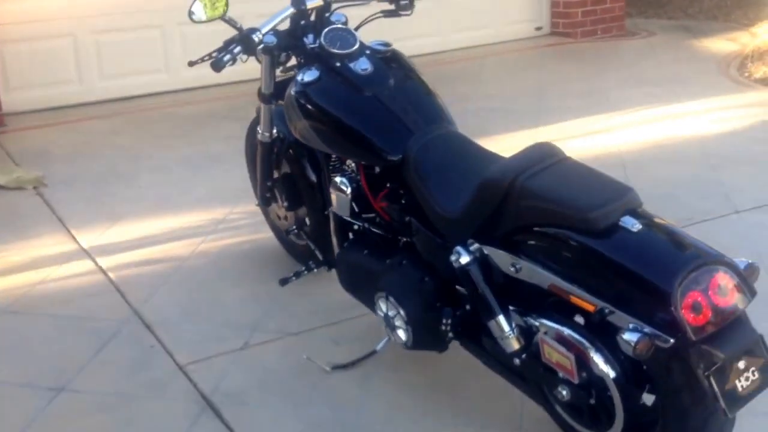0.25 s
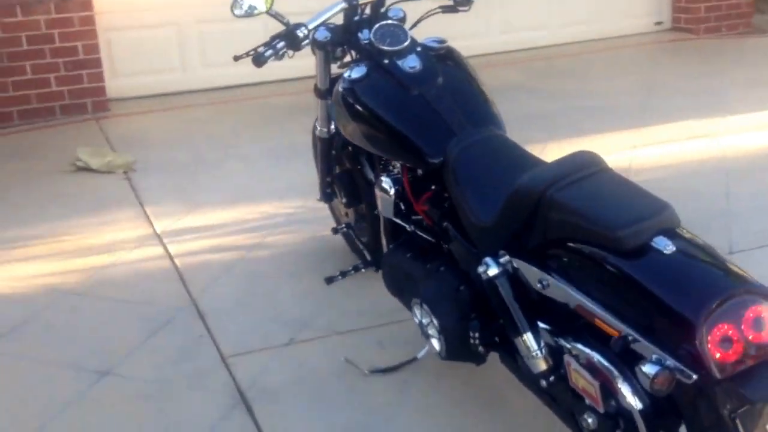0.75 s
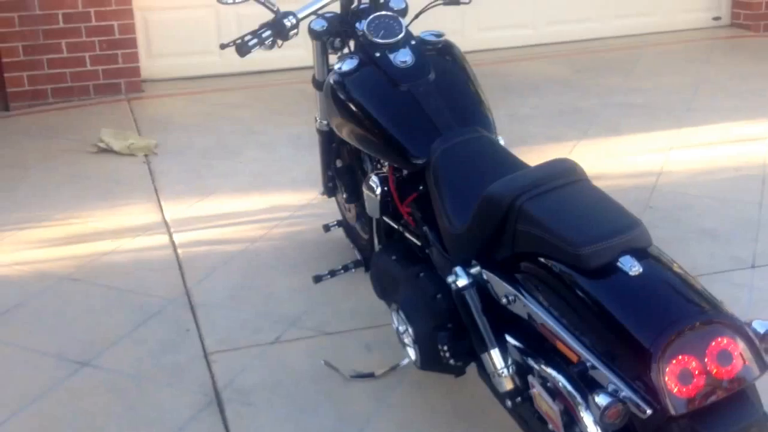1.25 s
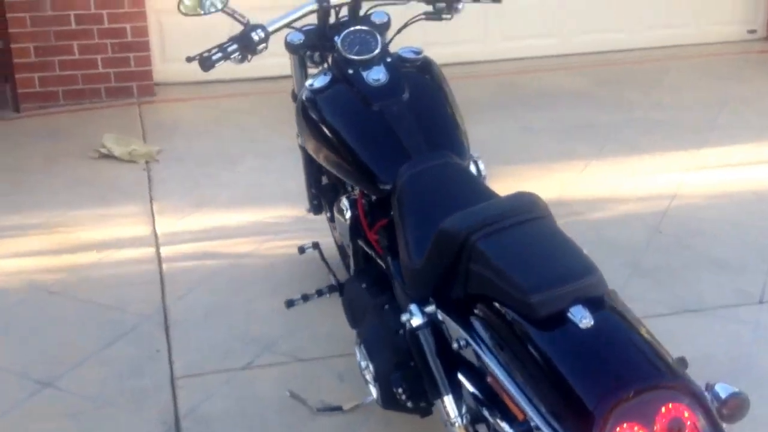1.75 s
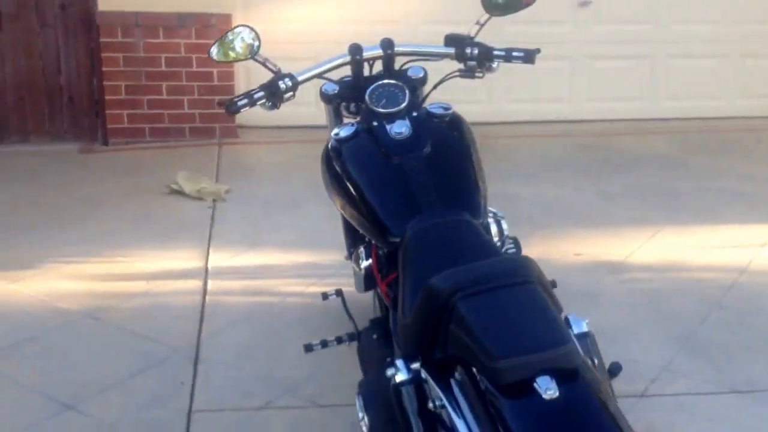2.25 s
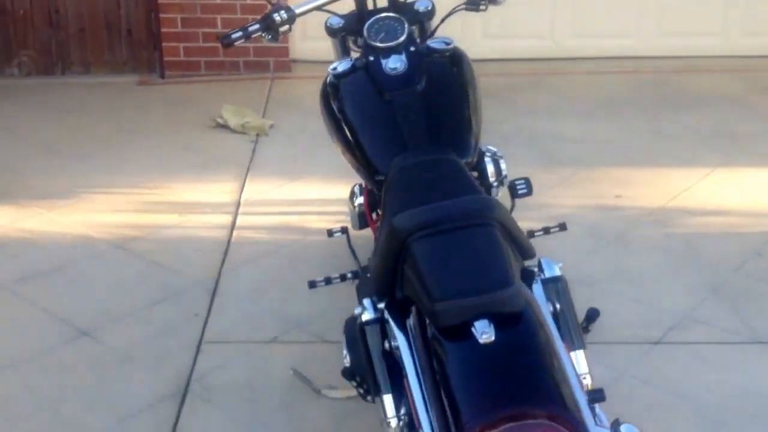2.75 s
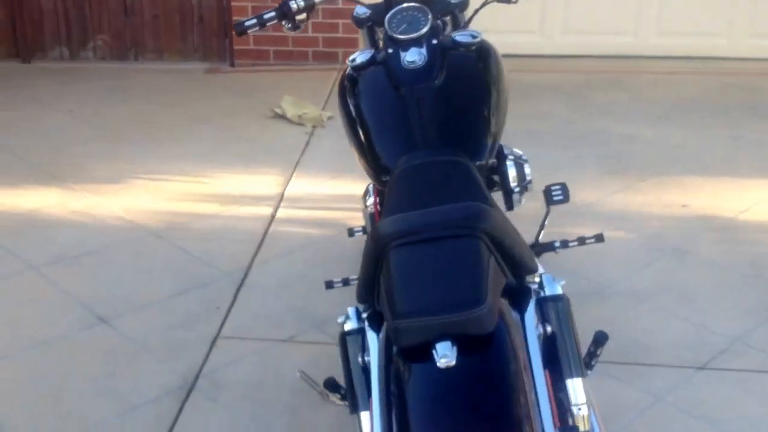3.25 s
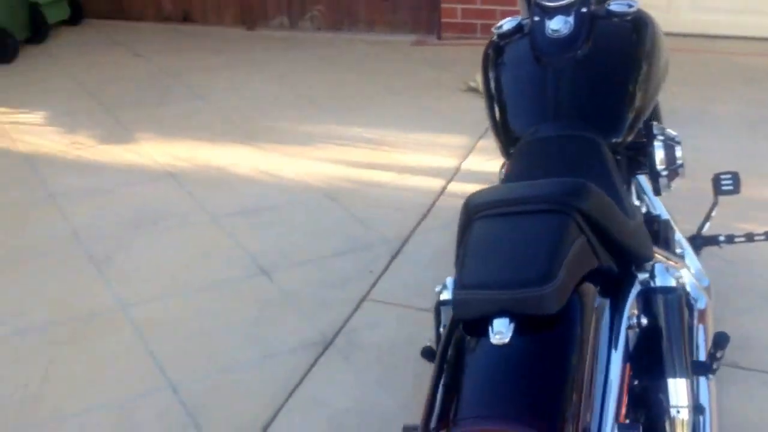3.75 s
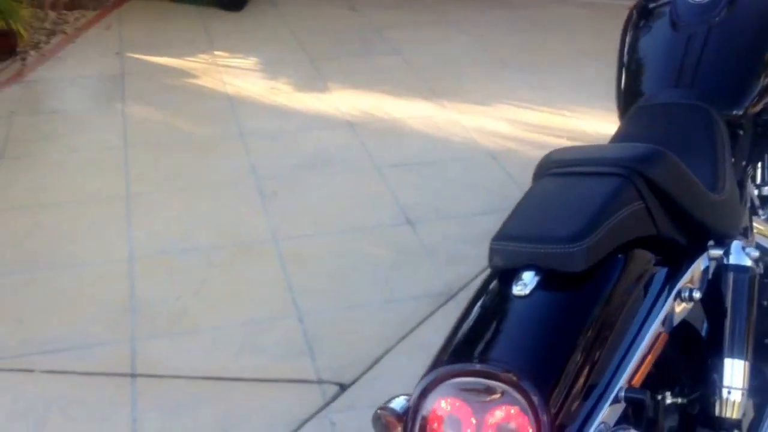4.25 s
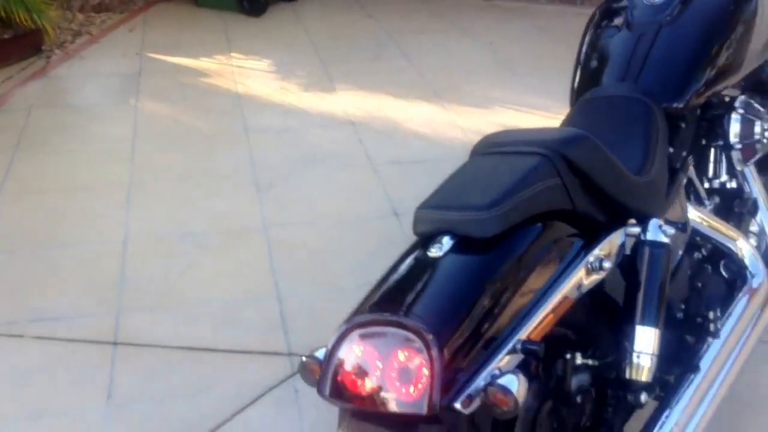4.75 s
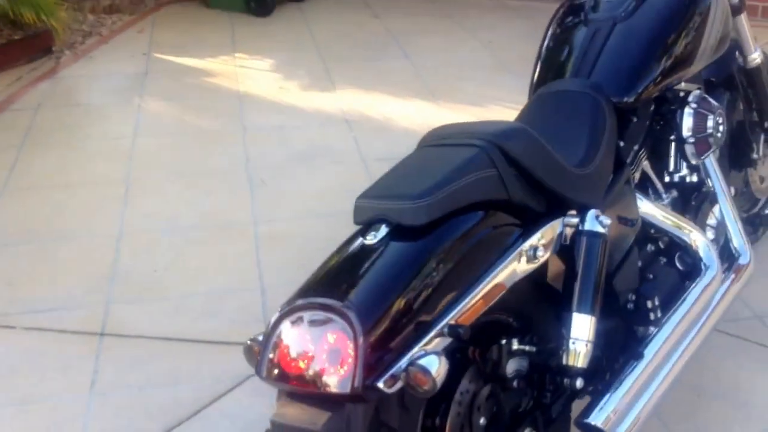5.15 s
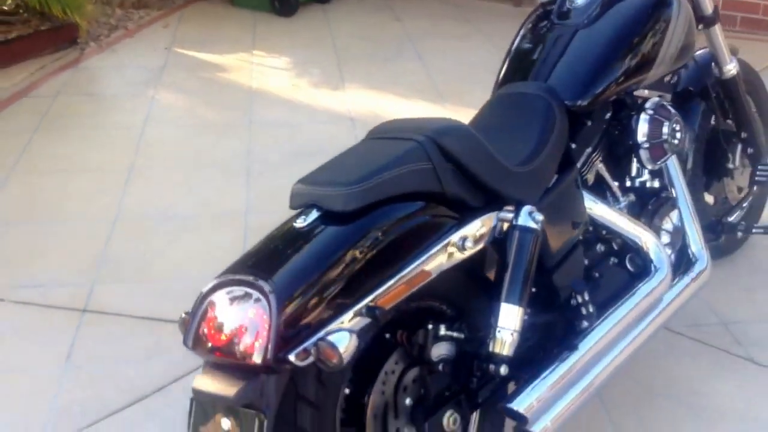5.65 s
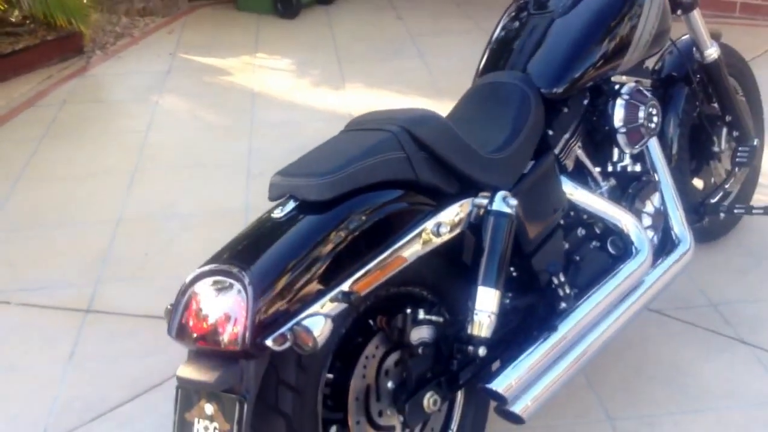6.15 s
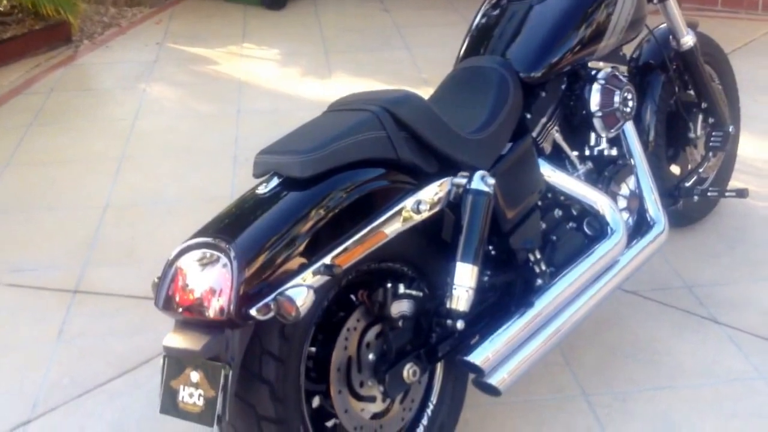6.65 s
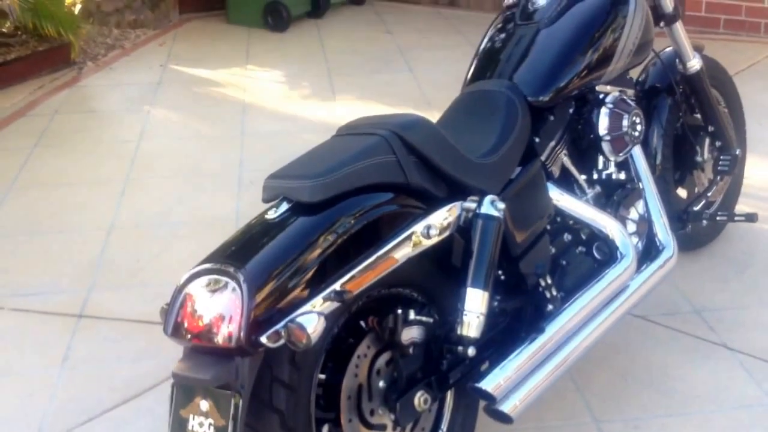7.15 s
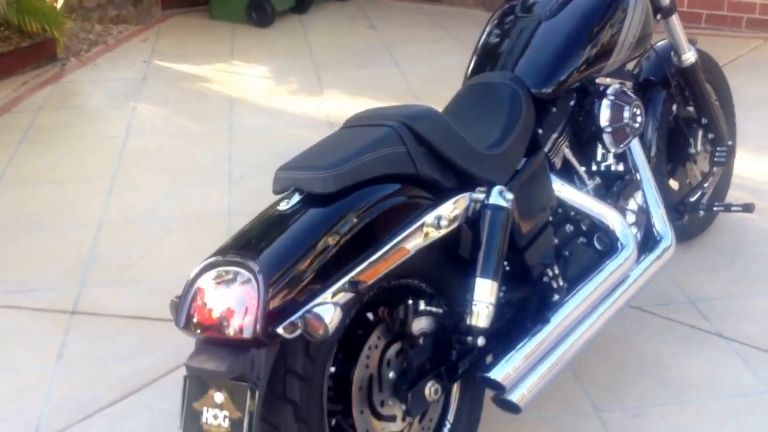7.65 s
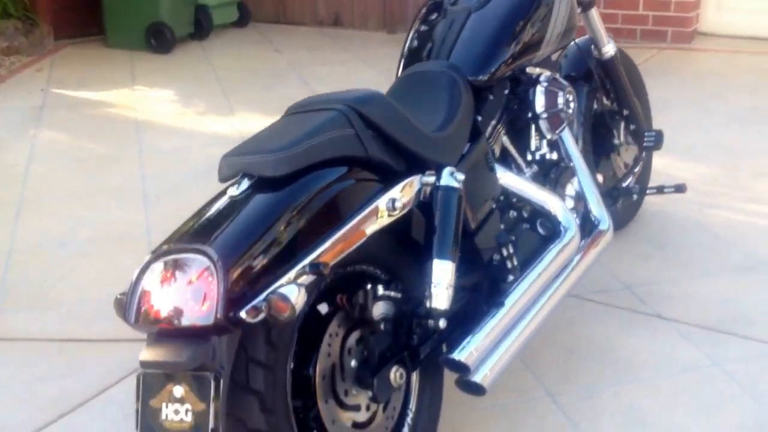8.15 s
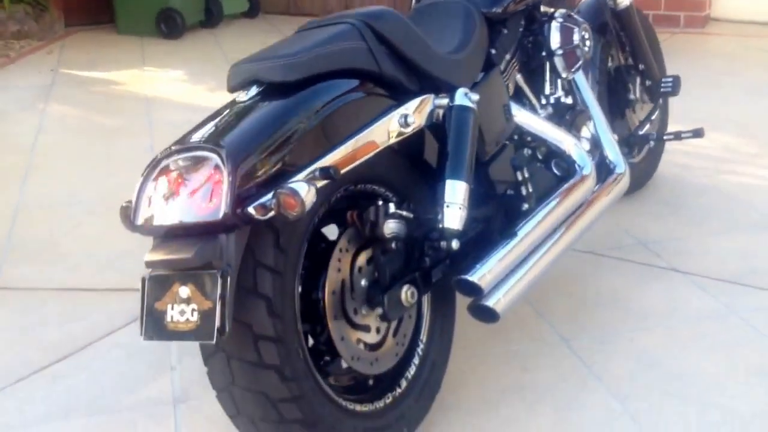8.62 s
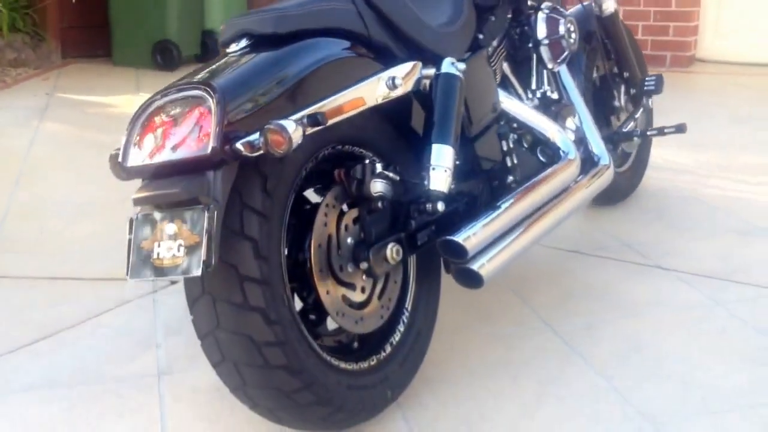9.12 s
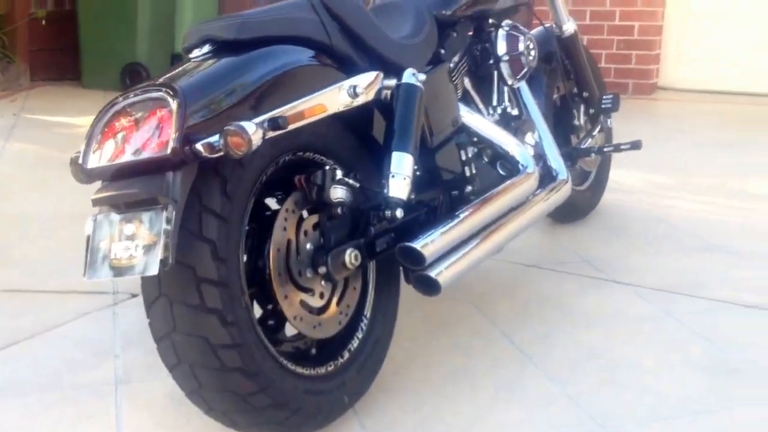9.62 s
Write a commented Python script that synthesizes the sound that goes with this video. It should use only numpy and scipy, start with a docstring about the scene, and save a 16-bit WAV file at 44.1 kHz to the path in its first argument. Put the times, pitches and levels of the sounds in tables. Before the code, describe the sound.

A big V-twin motorcycle idles loudly outdoors with an uneven, loping beat of exhaust thumps and sharp cracks.

```python
"""A big V-twin motorcycle idles unevenly on a concrete drive while the listener walks round its tail.
Two cylinders take turns to empty into two open pipes of different length: a thump rings the pipe and
the jet of gas cracks at its mouth. A misfire gives only a weak puff. Valves clack, the motor rattles
and hums underneath, a garage door and a far wall send echoes back, and a distant street rumbles."""
import sys
import numpy as np
from scipy import signal
from scipy.fft import rfft, irfft
from scipy.io import wavfile

SR = 44100
rng = np.random.default_rng(int(sys.argv[2]) if len(sys.argv) > 2 else 0)


def dump_mix(stems):
    """Bounce the given channels to the path in sys.argv[1] as a 16-bit WAV at rate SR."""
    frames = np.atleast_2d(stems).T  # one column per channel
    limited = np.clip(frames, -1, 1)  # hard clip at full scale
    pcm = np.round(limited * 32767).astype(np.int16)
    wavfile.write(sys.argv[1], SR, pcm)


N = 435702


def from_db(db):
    """Turn decibels into a volume factor."""
    return 10 ** (np.asarray(db) / 20)


def rms_one(x):
    """Scale a sound to an average strength (rms) of 1."""
    return x / np.sqrt(np.mean(x ** 2) + 1e-20)


def glide(times, values):
    """Move in straight lines from one timed value to the next."""
    return np.interp(np.arange(N) / SR, times, values)


def keep_band(x, side, hz, order):
    """Keep the "low" or "high" side of a frequency."""
    return signal.sosfilt(signal.butter(order, hz, side, fs=SR, output="sos"), x)


def clicks(times, sizes):
    """One-sample clicks at times given in seconds."""
    train = np.full(N, 1e-18)
    train[np.clip((np.asarray(times) * SR).astype(int), 0, N - 1)] = sizes
    return train


def ring(train, hz, ring_s):
    """Each click starts a tone; the ring time is how long it takes to fade by 60 dB."""
    decay, angle = from_db(-60 / (ring_s * SR)), 2 * np.pi * hz / SR
    return signal.lfilter([0, np.sin(angle)], [1, -2 * decay * np.cos(angle), decay ** 2], train)


def resonance(x, hz, width_hz):
    """Let through a band around one pitch."""
    decay = np.exp(-np.pi * width_hz / SR)
    feedback = [1, -2 * decay * np.cos(2 * np.pi * hz / SR), decay ** 2]
    return signal.lfilter(np.array([1, 0, -1]) * (1 - decay ** 2) / 2, feedback, x)


def swell(train, rise_s, fall_s):
    """Each click becomes a bump that rises and dies away."""
    t = np.arange(round(.08 * SR)) / SR
    shape = (1 - np.exp(-t / rise_s)) ** 2 * np.exp(-t / fall_s)
    return signal.fftconvolve(train, shape / shape.max())[:N]


def coloured(peaks):
    """Noise made of several resonating bands."""
    white = rng.standard_normal(N)
    return rms_one(sum((-1) ** k * from_db(db) * resonance(white, hz, width)
                       for k, (hz, width, db) in enumerate(peaks)))


def shaped(spectrum):
    """Noise whose level follows a curve from bass to treble."""
    hz, db = np.transpose(spectrum)
    grid_hz = np.arange(1, N // 2 + 2) * SR / N
    gain = from_db(np.interp(np.log(grid_hz), np.log(hz), db))
    return rms_one(irfft(rfft(rng.standard_normal(N)) * gain, N))


def street():
    """A far street rumbles."""
    # Each row: frequency in Hz, level in dB.
    rumble = [(10, 18), (52, -1), (90, -24), (300, -60)]
    return from_db(-53) * shaped(rumble)


def driveway(x, scatter_db):
    """Sound scatters off concrete and brick, then comes back as dull echoes."""
    # Garage door, then far wall. Each row: delay in seconds, level in dB.
    echoes = [(.038, -17.5), (.062, -26.5)]
    t = np.arange(round(.12 * SR)) / SR
    scatter = rng.standard_normal(len(t)) * from_db(-60 * t / .18) * (t > .004)
    scatter = keep_band(scatter, "high", 400, order=2)   # long waves pass round small things
    wash = from_db(scatter_db) * signal.fftconvolve(x, scatter)[:N]
    dull = keep_band(x, "low", 2500, order=1)
    return x + wash + sum(from_db(db) * np.r_[np.zeros(round(lag * SR)), dull][:N] for lag, db in echoes)


def bounce(x):
    """Quick reflections off the concrete and rear tyre colour the sound as the listener moves."""
    # Each row: time in seconds, first delay in ms, second delay in ms.
    bounces = [(0, 1.18, 0.95), (2.4, 1.16, 1.02), (3.1, 1.067, 1.266), (5.3, 1.1, 1.31),
               (6.8, 0.945, 1.305), (8.6, 1.044, 1.3), (9.88, 1.05, 1.42)]
    when, *delays_ms = np.transpose(bounces)
    now = np.arange(N)
    first, second = [np.interp(now - glide(when, ms) * SR / 1000, now, x) for ms in delays_ms]
    return x + from_db(-12) * first + from_db(-16) * second


def hollow(times, thump_db):
    """Each firing blows across the gap between engine, tyre and ground; the tone shifts with the walk."""
    # Each row: time in seconds, pitch in Hz, level against the hum in dB.
    gap_tone = [(0, 809, -5.5), (1.801, 832, -10.5), (2.599, 693, -15), (3.501, 600, 0), (4.499, 574, -11),
                (5.299, 797, -5), (6.001, 909.5, -1.5), (8.201, 899, 1), (8.701, 714, -4), (9.2, 650, 1.5),
                (9.88, 636, 2)]
    when, hz, db = np.transpose(gap_tone)
    wobble = keep_band(rng.standard_normal((2, N)), "low", 45, order=2)
    phase = 2 * np.pi * np.cumsum(glide(when, hz)) / SR
    tone = rms_one(wobble[0] * np.cos(phase) + wobble[1] * np.sin(phase))
    pulse = 1 + swell(clicks(times, from_db(thump_db + 22.5)), rise_s=.0022, fall_s=.019)
    return from_db(glide(when, db)) * rms_one(pulse) * tone


def clatter(loudness):
    """Rough metal contact sets the cooling fins and covers ringing."""
    # Each row: pitch in Hz, level in dB, ring time in seconds.
    fins = [(1390, -3, 0.0063), (1830, -7.5, 0.028), (2230, 1, 0.018), (2860, -2, 0.0052),
            (3400, 4, 0.0055), (3930, -1.5, 0.013), (4690, 2.5, 0.0066), (7540, -17, 0.015)]
    contact = loudness * rng.standard_normal(N)
    return sum(from_db(db - 33.5) * ring(contact, hz, ring_s) for hz, db, ring_s in fins)


def motor(rattle_db, hum_db, hollow_tone):
    """Chain, valve lifters and gears rattle over the hiss of air drawn in; the engine cases hum."""
    # Each row of both: frequency in Hz, level in dB.
    hiss_curve = [(760, -38), (1300, -1), (1720, -2), (2980, 1.5), (4800, -4.5), (5790, -6), (7200, -2.5),
                  (9920, -12.5), (13300, -11.5), (14600, -15), (15500, -27)]
    hum_curve = [(220, -29), (380, 2), (470, -2), (628, -5), (915, -8.5), (1120, -9), (1400, -11),
                 (1820, -23), (3080, -120)]
    ticks = (rng.random(N) < 120 / SR) * rng.exponential(1, N)   # about 120 a second
    grains = swell(ticks, rise_s=.0002, fall_s=.0032)
    rattle = shaped(hiss_curve) + from_db(-3) * rms_one(clatter(grains))
    hum = shaped(hum_curve) + hollow_tone
    return from_db(rattle_db) * rattle + from_db(hum_db) * hum


def valves(times, valve_db):
    """The valves clack at the same points of every engine cycle."""
    # Each row: share of the cycle after the long pipe's turn, level in dB.
    clacks = [(0.332, -6), (0.619, -23), (0.769, -3.5), (0.902, -35.5)]
    starts, cycle_s = times[:-2:2], np.diff(times[::2])
    at = np.concatenate([starts + share * cycle_s for share, _ in clacks])
    db = np.repeat(np.array(clacks)[:, 1], len(starts)) + 3.6 * rng.standard_normal(len(at))
    return from_db(valve_db) * clatter(swell(clicks(at, from_db(db)), rise_s=.00057, fall_s=.0055))


def whistle(times, crack_db, whistle_db):
    """The short pipe whistles faintly while its gas runs out."""
    loudness = swell(clicks(times[1::2] + .021, from_db(crack_db[1::2])), rise_s=.0021, fall_s=.027)
    band = resonance(rng.standard_normal(N), 7400, width_hz=450)
    return from_db(whistle_db) * loudness * rms_one(resonance(band, 7400, width_hz=450))


def firings(puff_db, spit_db, treble_db):
    """The pipes take turns at uneven spacing, long pipe first; a turn that is not listed misfires."""
    # Firings that catch. Each row: start in seconds, crack in dB, thump in dB, crack pitch in Hz.
    good_firings = [(.0575,-27,-16,1820),(0.1328,-4,-10,2950),(0.1863,-10.5,-12.5,2320),(0.25,-15,-12.5,2880),(0.2992,-34,-22,2550),
                    (0.3713,-10.5,-12,2900),(0.4976,-24,-17,1810),(0.5549,-4.5,-8.5,2400),(0.6259,-13,-12,3170),(0.677,-19,-11,2270),
                    (0.7992,-18,-13.5,2400),(.87,-2.5,-7.5,3160),(0.924,-26,-17,3390),(0.9958,-21,-12,3680),(1.0468,-10,-8,3240),
                    (1.113,-8.5,-9,3120),(1.1675,-20,-16.5,3730),(1.3709,-9,-8.5,3600),(1.425,-8,-8.5,1730),(1.4969,-11.5,-12.5,2700),
                    (1.5487,-13,-13,2760),(1.614,-13.5,-13,3330),(1.7358,-12,-10.5,3420),(1.786,-37,-16.5,1830),(1.8583,-14.5,-12.5,3400),
                    (1.9114,-6,-9.5,3300),(1.9767,-14,-13.5,3270),(2.0316,-35,-17.5,1840),(2.099,-12.5,-10.5,2430),(2.1489,-24,-17.5,3170),
                    (2.2213,-12.5,-12.5,2920),(2.2729,-7.5,-9,3300),(2.3374,-16.5,-13.5,3250),(2.4606,-12.5,-9.5,2220),(2.516,-49,-18,3320),
                    (2.5832,-21,-17.5,1830),(2.6397,-3,-7.5,3070),(2.7044,-9,-9.5,4330),(2.9488,-0.5,-7.5,3840),(3.001,-5,-12,3180),
                    (3.0655,-9.5,-17,3000),(3.182,-8.5,-11.5,3120),(3.3035,-25,-20,2050),(3.356,-6.5,-13.5,3120),(3.4217,-8,-13,2880),
                    (3.5918,-15.5,-20.5,1790),(3.7201,-6.5,-14,1850),(3.7848,-3,-13.5,3800),(4.0299,-0.5,-14,2650),(4.0829,-3.5,-13.5,3500),
                    (4.151,-10.5,-18,1690),(4.206,-14.5,-22,3500),(4.2721,-4.5,-14,3370),(4.3993,-16.5,-18,1750),(4.458,-4.5,-16,2730),
                    (4.5259,-10,-21,3520),(4.701,-11.5,-34,2530),(4.7782,-1,-15,3030),(4.8342,-2.5,-13,2120),(4.9026,-3,-14,2950),
                    (4.9588,-16,-24,2260),(5.0793,-16,-26,2430),(5.1541,-0.3,-17.5,2870),(5.2078,-3,-16.5,2700),(5.4011,-2,-16.5,2940),
                    (5.5267,-7.5,-17.5,2340),(5.582,-4,-13,2430),(5.6481,-7,-13,2860),(5.702,-12.5,-32,2240),(5.8159,-4,-14,2300),
                    (5.8846,-6,-14,2250),(5.9314,-18,-19.5,2310),(5.9968,-38,-21,3270),(6.0451,-6,-14.5,2896),(6.1092,-4.5,-14,3680),
                    (6.3474,-2.5,-15.5,3830),(6.3987,-8,-16.5,3930),(6.5863,-4.5,-19.5,3680),(6.6405,-5,-15.5,3740),(6.711,-8,-17.5,3670),
                    (6.8885,-4.5,-17,2940),(6.9599,-3,-15.5,2180),(7.0785,-11.5,-15,2250),(7.1295,-6.5,-14,2750),(7.193,-6.5,-15,3960),
                    (7.3069,-12,-14.5,2230),(7.3585,-14.5,-18.5,2250),(7.426,-5,-14,2310),(7.4771,-8,-15,2340),(7.544,-13,-17,2840),
                    (7.664,-10.5,-16,2720),(7.7175,-10,-16.5,2140),(7.7859,-14,-17.5,2750),(7.8384,-4,-11,2370),(7.9066,-5,-14.5,2880),
                    (7.9597,-32,-20,2400),(8.0807,-6,-12,3170),(8.1505,-3.5,-16,4000),(8.3297,-7,-14.5,4300),(8.401,-4.5,-18.5,3610),
                    (8.6632,-5.5,-14.5,4630),(8.7158,-4.5,-14,2940),(8.9025,-8,-14,2650),(8.9538,-32,-19,2100),(9.0227,-17.5,-17,2490),
                    (9.0727,-7,-16,2230),(9.1391,-9,-21,2700),(9.374,-7.5,-15.5,4250),(9.4242,-5,-12.5,2906),(9.6173,-1,-19,2770),
                    (9.6731,-7.5,-14,2310),(9.744,-3,-18,3430)]
    # Long pipe, then short. Each row, in dB: misfire crack, misfire thump, sizzle against the crack,
    # the same in a misfire, valve kick, change in that kick per dB of crack.
    pipes = [(-27.5, -34, -10.5, -4.5, -35, -0.36), (-25, -29, -5, -1, -23, .15)]
    cycle_s, short_lag = .1215, 315 / 720   # two crank turns; the short pipe's delay as a share of them
    starts, good_crack_db, good_thump_db, good_hz = np.transpose(good_firings)
    turns = np.arange(2 * round(N / SR / cycle_s) + 4)
    cycles = turns // 2 + short_lag * (turns % 2)
    fired = [1]   # the first to catch is the short pipe
    for gap in np.diff(starts):
        fired.append(np.argmin(abs(cycles - cycles[fired[-1]] - gap / cycle_s)))
    turns, known = turns[:fired[-1] + 3], cycles[fired]
    times = np.interp(cycles[turns], np.r_[known[0] - 1, known, known[-1] + 1],
                      np.r_[starts[0] - cycle_s, starts, starts[-1] + cycle_s])
    pipe, caught, sample = turns % 2, np.isin(turns, fired), (times * SR).astype(int)
    weak_db, soft_db, sizzle_db, fizz_db, kick_db, kick_slope = np.transpose(pipes)[:, pipe]
    luck = rng.standard_normal((len(times), 4)).T
    # With each further misfire in a row, the crack fades and the puff builds.
    missed = turns - np.maximum.accumulate(turns * caught) - 1
    crack = weak_db + spit_db[sample] - 3 * missed + 5.5 * luck[0]
    thump = soft_db + puff_db[sample] + missed + 5.5 * luck[1]
    pitch = rng.choice(good_hz, len(times))
    crack[fired], thump[fired], pitch[fired] = good_crack_db, good_thump_db, good_hz
    sizzle = crack + np.where(caught, sizzle_db, fizz_db) + treble_db[sample] + 3 * luck[2]
    unburnt = (pipe == 1) & caught & ~np.isin(turns - 2, fired)   # the short pipe missed its last turn
    sizzle += 2 * unburnt
    kick = kick_db + kick_slope * crack + 3 * luck[3]
    return times, crack, sizzle, thump, kick, pitch


def cracks(times, crack_db, sizzle_db, pitch_hz, air_db, wake_db):
    """The gas jet tears out just behind the pressure front: a short burst with a longer, rough wake."""
    # Each row of all three: pitch in Hz, width in Hz, level in dB.
    mouth = [(1310, 1100, -7.5), (2250, 1240, 2.5), (2880, 970, 3.5), (3680, 730, 1.5), (4640, 1440, -2.5)]   # pipe mouths and chrome shields
    high_hiss = [(6410, 1800, 8), (7330, 1330, 13), (8250, 1600, -11)]
    top_hiss = [(11550, 3300, -0.3), (13130, 2800, 2), (14500, 1100, -2)]
    bursts = clicks(times + .0014, from_db(crack_db - 10))
    wake = from_db(wake_db) * swell(bursts, rise_s=.004, fall_s=.015)
    sputter = from_db(.54 * rms_one(resonance(rng.standard_normal(N), 170, width_hz=450)))
    loudness = (swell(bursts, rise_s=.0015, fall_s=.0027) + wake) * sputter
    jet = loudness * coloured(mouth)
    bright = np.clip(from_db(2 * air_db), 0, 1)   # the bike's body hides the treble from its far side
    jet = bright * jet + (1 - bright) * keep_band(jet, "low", 4100, order=2)
    rush = loudness * rng.standard_normal(N)
    for start, hz in zip((times * SR).astype(int), pitch_hz):   # one mouth tone stands out in each crack
        span = slice(start, start + round(.045 * SR))
        jet[span] += from_db(15) * resonance(rush[span], hz, width_hz=280)
    spits = clicks(times + .00052, from_db(sizzle_db - 12.5))
    fizz = swell(spits, rise_s=.0023, fall_s=.0029)
    fizz += from_db(-23) * swell(spits, rise_s=.0066, fall_s=.0092)
    return jet + fizz * (coloured(high_hiss) + from_db(air_db) * coloured(top_hiss))


def pipe_ring(tones, times, db, spread_db, detune):
    """Each pulse rings the pipe's tones unevenly; hotter or cooler gas shifts their pitch."""
    out, luck = np.zeros(N), rng.standard_normal((len(times), len(tones)))
    warmth = rng.integers(-1, 2, len(times))
    for k, (hz, tone_db, ring_s) in enumerate(tones):
        sizes = from_db(db + tone_db + spread_db * luck[:, k])
        for step in (-1, 0, 1):
            out += ring(clicks(times, sizes * (warmth == step)), hz * (1 + detune * step), ring_s)
    return out


def thumps(times, crack_db, thump_db, kick_db, bark_db):
    """A sharp pressure front leaves the pipe; the air inside swings back and rings, fed by the gas flow."""
    # Tones of the air in the pipes. Each row: pitch in Hz, level in dB, ring time in seconds.
    long_pipe = [(71, -11.5, 0.18), (138, -7, 0.069), (152.4, 2.5, 0.12), (200.2, -4.5, 0.11),
                 (272.3, -5, 0.29), (348.4, -12, 0.15), (469, -43, .05)]
    short_pipe = [(86.5, -21, 0.26), (122, -17.5, 0.13), (180.2, -4, 0.13), (247.3, 1, 0.18),
                  (278, -6.5, 0.095), (334, -9, 0.093), (552, -14, 0.057)]
    bark_tones = [(540, -19.5, 0.13), (662, -13, 0.087), (754, -1.5, 0.042), (941, -1, 0.035),
                  (1042, -12.5, 0.11), (1264, -4.5, 0.066), (1474, -10, 0.062)]   # higher tones, strong in hard firings
    swing = np.zeros(N)
    for tones, own in ((long_pipe, slice(0, N, 2)), (short_pipe, slice(1, N, 2))):
        gust = swell(clicks(times[own], from_db(thump_db[own] - 39)), rise_s=.008, fall_s=.025)
        flow = (gust + from_db(-60)) * rng.standard_normal(N)
        kicks = np.r_[times[own], times[own] + .039]   # the closing valve kicks the air again
        swing += pipe_ring(tones, kicks, np.r_[thump_db[own], kick_db[own]], spread_db=3.5, detune=.029)
        swing += sum(from_db(db) * ring(flow, hz, ring_s) for hz, db, ring_s in tones)
    swing = keep_band(swing, "low", 600, order=1)   # the valve takes a moment to open
    swing = keep_band(swing, "high", 150, order=1)   # a small mouth gives off little bass
    bark = pipe_ring(bark_tones, times, (thump_db + crack_db) / 2, spread_db=4, detune=.059)
    front = swell(clicks(times - .0005, from_db(thump_db + 1.5)), rise_s=.0003, fall_s=.0004)
    return front - swing - from_db(bark_db) * bark


def scene():
    """Exhaust and valves echo in the drive, over the motor and the street."""
    # The walk round the tail. Each row: time in seconds, share of the way to the pipe side (0 to 1),
    # then rattle, sizzle, top treble and bark in dB.
    walk = [(0, .01, -35.5, -5, -4, -11.5), (1.2, 0.15, -37, -4, -6, -10.5),
            (2.39, .3, -39.5, 2.5, -7, -13.5), (2.9, 0.4, -39, 0.5, -2, -11.5),
            (3.58, 0.78, -43.5, 10.5, -10.5, -19.5), (4.2, 0.6, -42.5, 0, -3, -14.5),
            (4.8, 0.9, -44, 4.5, -8, -14), (5.2, 1, -45, -3, -2.5, -19),
            (5.81, 0.64, -40, -3.5, 3.5, -12.5), (6.77, .99, -43.5, -4.5, 3, -14),
            (7.5, 1, -40, 0, .6, -11.5), (8.3, 0.84, -44, -3, 1, -10.5), (8.94, 0.8, -43, 1.2, 3.5, -9),
            (9.88, 0.96, -45.5, 1.5, -2.5, -12.5)]
    # Far side, then pipe side. Each row, in dB: hum, valves, wake, whistle, scatter, misfire thump,
    # misfire crack.
    sides = [(-34.5, -24, -23, -27, -32, 8, -5.5), (-40.5, -17, -21, -45, -51, -7.5, 0.5)]
    when, *columns = np.transpose(walk)
    share, rattle_db, treble_db, air_db, bark_db = [glide(when, column) for column in columns]
    levels = [far + (near - far) * share for far, near in np.transpose(sides)]
    hum_db, valve_db, wake_db, whistle_db, scatter_db, puff_db, spit_db = levels
    times, crack_db, sizzle_db, thump_db, kick_db, pitch_hz = firings(puff_db, spit_db, treble_db)
    exhaust = cracks(times, crack_db, sizzle_db, pitch_hz, air_db, wake_db)
    exhaust += whistle(times, crack_db, whistle_db)
    exhaust += thumps(times, crack_db, thump_db, kick_db, bark_db)
    beats = driveway(exhaust + valves(times, valve_db), scatter_db)
    bike = bounce(beats + motor(rattle_db, hum_db, hollow(times, thump_db)))
    bike = keep_band(bike, "high", 72, order=8)   # narrow pipes give off no deep bass
    return (bike + street())[None]


def record(dry):
    """Round off the loudest peaks and cut the highest treble."""
    rounded = 1.388 * np.tanh(dry / 1.036)
    return signal.sosfilt(signal.cheby2(16, 60, 15700, fs=SR, output="sos"), rounded)


dry = scene()
out = record(dry)
dump_mix(out)
```